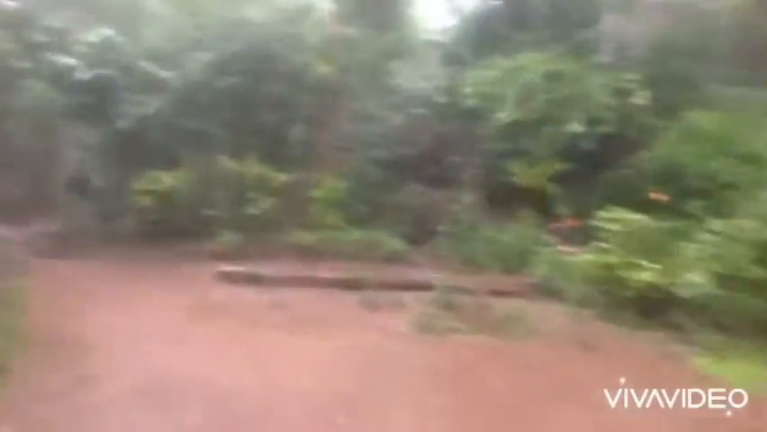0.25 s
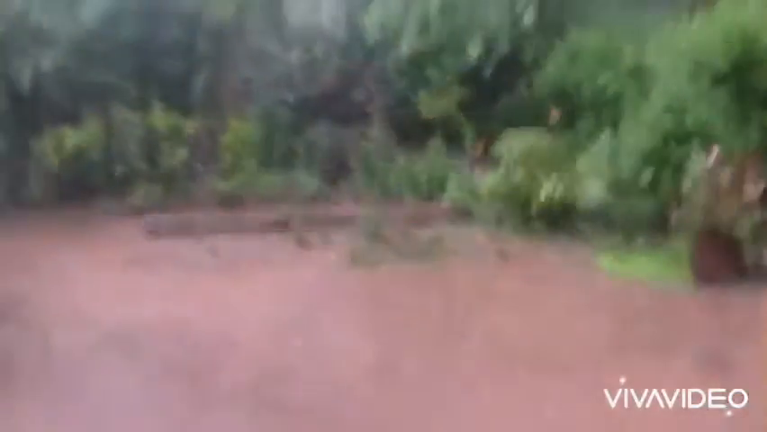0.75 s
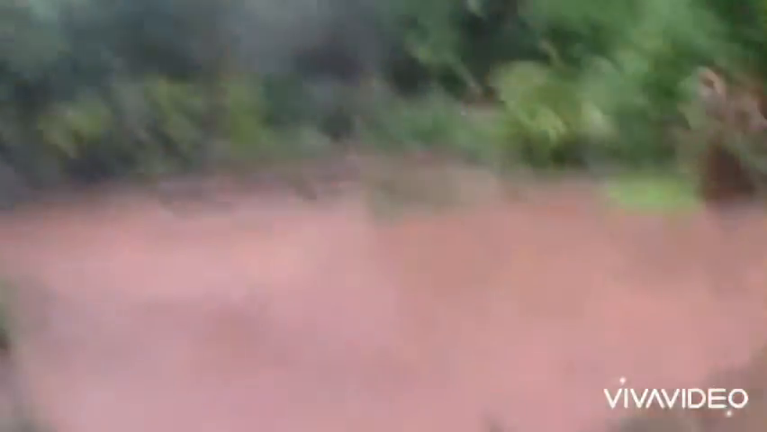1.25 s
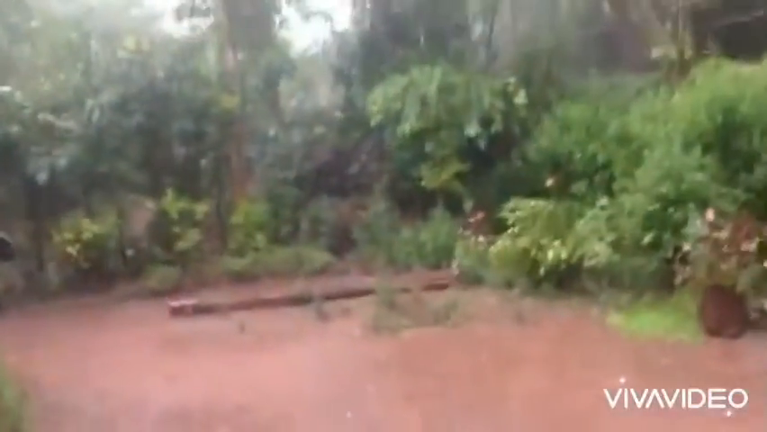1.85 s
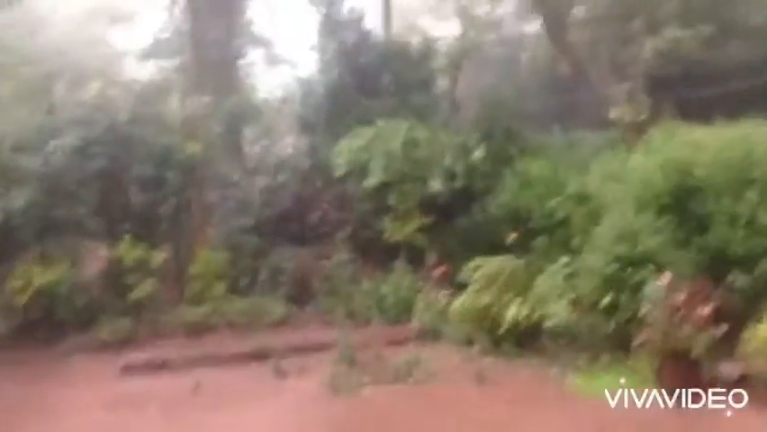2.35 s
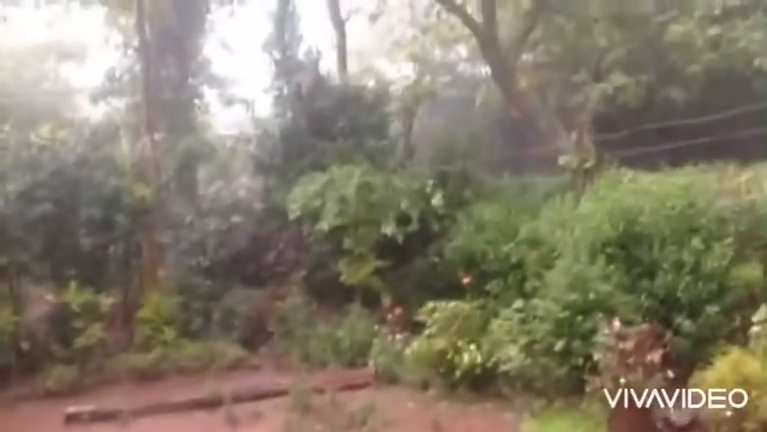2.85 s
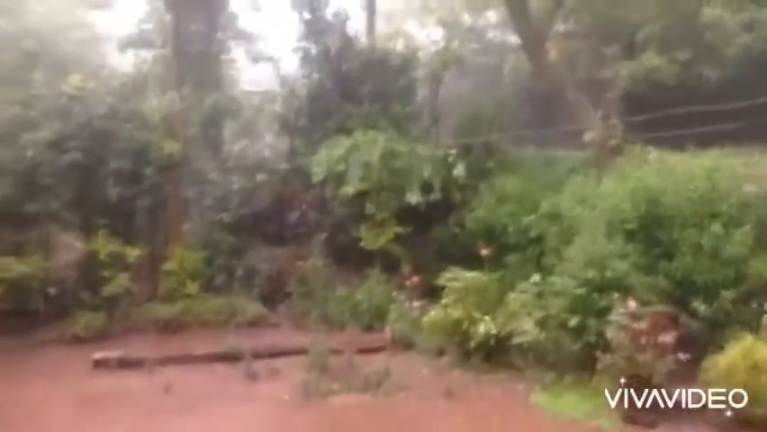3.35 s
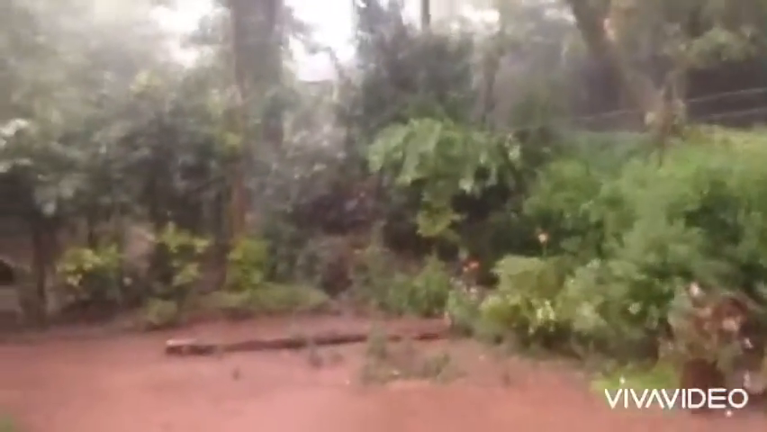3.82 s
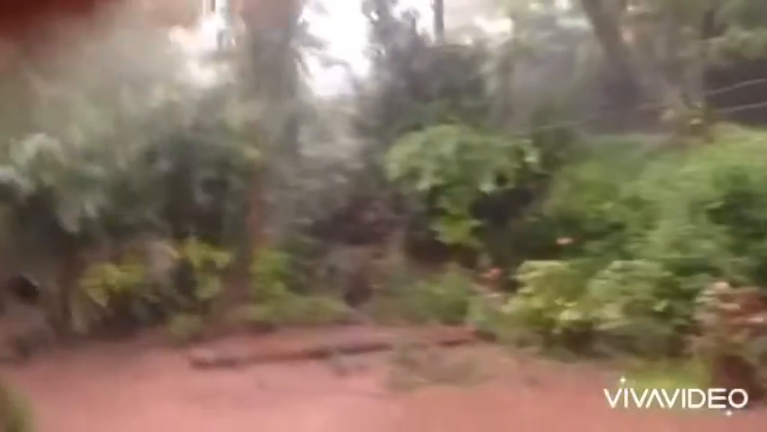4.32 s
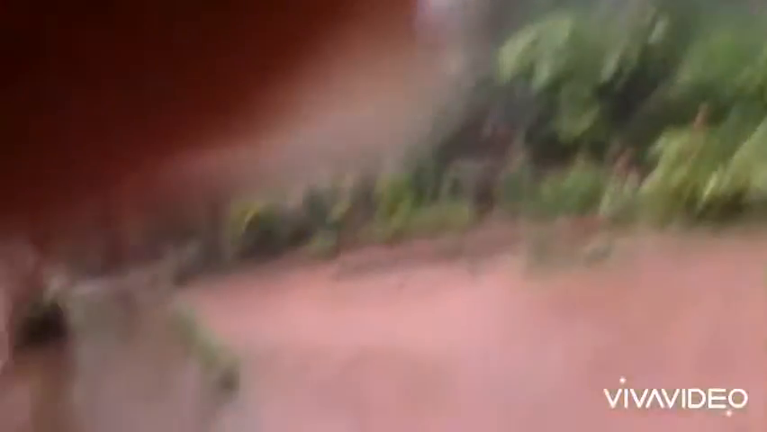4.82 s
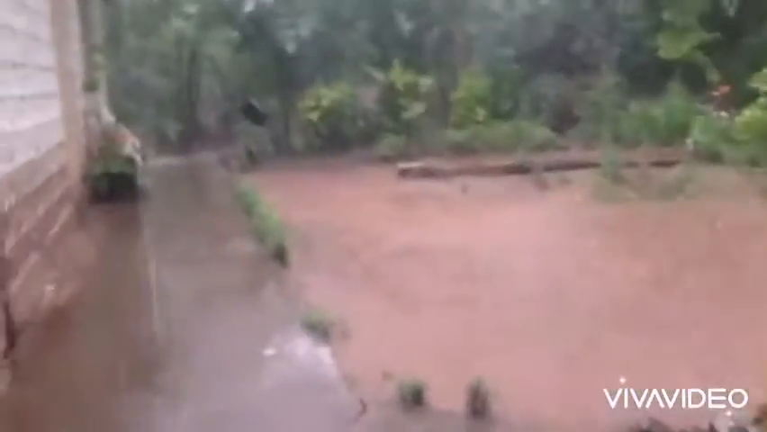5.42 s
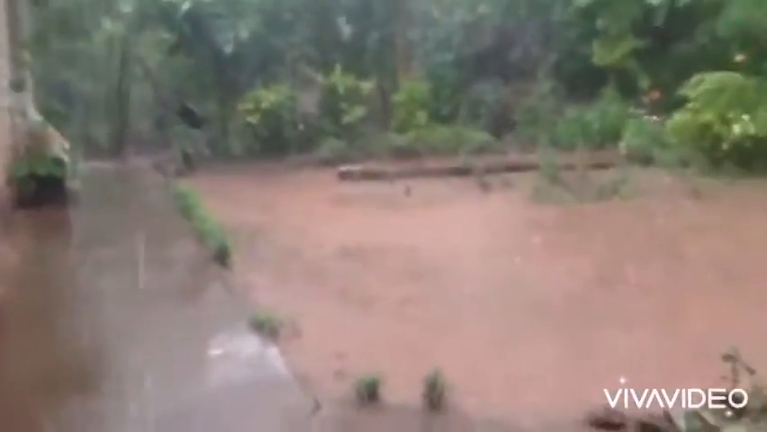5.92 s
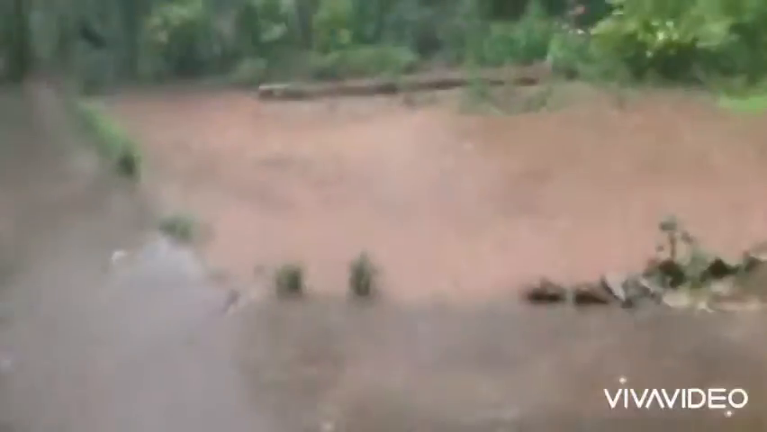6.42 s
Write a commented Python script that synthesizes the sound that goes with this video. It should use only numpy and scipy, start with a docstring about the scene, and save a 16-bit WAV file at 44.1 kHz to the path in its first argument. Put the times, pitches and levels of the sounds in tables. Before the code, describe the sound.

Outdoors in a downpour, the close mono microphone catches sharp wet claps and short plopping rings over a continuous rush of rain on puddles and leaves. Splashes crowd the opening, then come farther apart; crisp bright ticks gather around four seconds. One strong slap lands near five, then the wash eases slightly. Low roof rumble and occasional soft thuds sit far below.

```python
"""Heavy rain on a flooded yard and its bushes, heard from under the eaves in mono.
The far drops merge into a wash of shaped noise; nearer drops are short rings that plop, crackle and tick.
Water gathered on the eaves slaps the wet paving close by: ringing air, a clap of clicks and a spray.
Behind it the roof drums dully in low noise, and soft wobbling thuds bump the microphone."""
import sys
import numpy as np
from scipy import signal
from scipy.fft import rfft, irfft
from scipy.io import wavfile
from scipy.ndimage import uniform_filter1d, minimum_filter1d

SR = 44100
rng = np.random.default_rng(int(sys.argv[2]) if len(sys.argv) > 2 else 0)


def pcm_store(signal):
    """Save signal as 16-bit PCM."""
    levels = np.round(np.clip(np.atleast_2d(signal), -1, 1) * 32767)
    wavfile.write(sys.argv[1], SR, levels.astype(np.int16).T)


N = 294147
TIME = np.arange(N) / SR  # s


# How hard it rains, as the level of the wash: (time [s], level [dB])
RAIN_LEVEL = [(0, -28.5), (.6, -27.5), (1.1, -27.5), (1.45, -29), (2.15, -27.5), (2.4, -29.5), (2.6, -26.5),
              (3.3, -27), (3.9, -26), (5.05, -28), (5.35, -31.5), (6.2, -30), (6.67, -32.5)]
# Colour of the wash: (frequency [Hz], relative level [dB])
WASH_COLOUR = [(180, -25.5), (300, -2), (430, -4.5), (600, -3.5), (850, -1.5), (1200, -1.2), (1800, 1),
               (2020, 0.2), (2380, 1), (2520, -2.5), (2720, -7), (3000, -12), (4300, -33)]


def wash():
    """Far rain on puddles and leaves merges into noise, with nearer plops standing out of it."""
    def colour(f):
        return read(WASH_COLOUR, f)
    far = coloured(rng.standard_normal(N), colour)
    plops = patter(882, 2780, per_s=400, spread_db=0.5, cycles=1.3)
    near = coloured(plops, colour)
    rain = patchy(far + gain_of(-9.5) * near, depth_db=1.3, flicker_db=-0.01)
    return level(RAIN_LEVEL) * rain


def with_rain(db, follows):
    """Gain over time of a layer at db in the usual rain, moving by follows dB per dB of the wash."""
    usual_rain_db = -28
    return gain_of(db) * (level(RAIN_LEVEL) / gain_of(usual_rain_db)) ** follows


# Colour of the fine rain; its drops get half these dB: (frequency [Hz], relative level [dB])
FIZZ_COLOUR = [(1500, -27), (2600, -7), (3200, 1), (4200, -0.7), (5500, -5), (7200, -8.5), (9600, -11.5),
               (10500, -23)]
FIZZ_DB, FIZZ_FOLLOWS = -39.5, 0.84  # hiss in the usual rain, dB per dB of the wash


def fizz():
    """Fine drops crackle on the paving, growing then steady, over a hiss that follows the downpour."""
    hiss = coloured(rng.standard_normal(N), lambda f: read(FIZZ_COLOUR, f))
    hiss = patchy(hiss, depth_db=1.93, flicker_db=-0.26)
    drops = patter(3200, 9540, per_s=1000, spread_db=3.5, cycles=0.91)
    # the smallest, highest drops are the faintest
    drops = coloured(drops, lambda f: np.sqrt(read(FIZZ_COLOUR, f)))
    return with_rain(FIZZ_DB, FIZZ_FOLLOWS) * hiss + spatter_level() * drops


SPATTER_START_DB, SPATTER_END_DB, SPATTER_GROW_S = -53.5, -44.5, 4.2


def spatter_level():
    """Gain over time of the fine drops close by: a steady growth, then a hold."""
    return level([(0, SPATTER_START_DB), (SPATTER_GROW_S, SPATTER_END_DB)])


# Compactness makes a landing faster, narrower in pitch and richer in ringing air
LOOSE_RISE_S, SOLID_RISE_S = 0.0061, 0.0005
LOOSE_OCTAVES, SOLID_OCTAVES = 1.58, 0.22
SOLID_RING, RING_POWER = 1, 3  # energy share of the ring in a solid lump, curve towards it


def landing_of(compact):
    """Spread (octaves), energy share of bubble ring and rise (s) of a splash from its compactness."""
    compact = np.clip(compact, 0, 1)
    spread = LOOSE_OCTAVES * (SOLID_OCTAVES / LOOSE_OCTAVES) ** compact
    rise = LOOSE_RISE_S * (SOLID_RISE_S / LOOSE_RISE_S) ** compact
    ring = np.clip(SOLID_RING * compact ** RING_POWER, 0, 1)
    return spread, ring, rise


def burst(t, rise, length, tail_db, t60):
    """Two envelopes of a splash: the water landing, and its echo between wall and eaves."""
    landing = np.exp(-(t / length) ** 4)
    echo = (1 - landing) * gain_of(tail_db - 60 * (t - length) / t60) ** 2
    return (1 - np.exp(-t / rise)) * np.sqrt([landing, echo])


# Water slapping on the paving: (time [s], slap level [dB], centre pitch [Hz], length [s],
# spray level [dB], compactness [0-1, loose scatter to one solid lump])
SPLASHES = [ (0.012, -26, 1900, 0.032, -39, 0.5), (0.074, -22, 1770, 0.035, -40, 0.42),
            (0.256, -20.5, 1880, 0.02, -42, 0.17), (0.306, -12, 2070, 0.0068, -25, 0.92),
            (0.464, -20, 1770, .011, -38, 0.5), (0.4805, -8.5, 1800, 0.018, -31.5, 0.98),
            (0.930, -15, 1790, 0.028, -29.5, 0.47), (0.992, -27.5, 1790, 0.063, -38.5, 0.54),
            (1.339, -26, 2250, .008, -45, 0.76), (1.525, -19.5, 680, .065, -31.5, 0),
            (1.611, -22, 1760, 0.046, -31, 0.2), (1.752, -12.5, 1340, 0.021, -34, 0.7),
            (2.037, -24, 1880, .024, -30, 0), (2.466, -30, 1900, 0.043, -34, 0.1),
            (2.829, -20.5, 2266, 0.022, -29, 0.67), (3.399, -14.5, 1800, 0.019, -24.5, 0.46),
            (3.589, -18, 1900, 0.0072, -34, 0.53), (4.194, -23, 1790, .017, -27.5, 0.65),
            (4.214, -19, 1970, 0.021, -38, 0.5), (5.1135, -7, 1784, 0.022, -26, 0.73),
            (5.116, -16.5, 736, 0.02, -33, 0.58), ]
# Colour of the clap, before it is narrowed around the pitch: (frequency [Hz], relative level [dB])
SLAP_COLOUR = [(60, -31), (250, -4.5), (650, -1), (2400, 1), (2800, -6), (5000, -28), (10000, -29.5)]
# Colour of the droplets, before tilting in a splash or narrowing in a tick:
# (frequency [Hz], relative level [dB])
SPRAY_COLOUR = [(1200, -26.5), (2500, -13.5), (3400, 0.5), (4800, -5), (6500, -10), (9300, -11.5),
                (10500, -29)]
# A low-pitched splash throws a duller spray: tilt at the usual pitch, its change per octave of pitch
SPRAY_TILT_DB, TILT_FOLLOWS_DB, USUAL_SLAP_HZ = -1, 2, 1850


def splash(slap_db, hz, length, spray_db, compact, size=16384):
    """A lump of water claps on the wet ground, traps air that rings briefly, and throws droplets."""
    t = np.arange(size) / SR
    spread, ring, rise = landing_of(compact)

    def clap(octaves):
        def band(f):
            distance = abs(np.log2((f + 1) / hz) / octaves)
            return read(SLAP_COLOUR, f) / np.hypot(1, distance ** 1.7)
        return coloured(impacts(size, per_s=12000, spread_db=-0.3), band)

    # the air pocket wobbles, and its pitch climbs as it closes
    pitch = hz * (1 + 0.099 * sway(size, order=24) + 0.044 * np.tanh(2 * t / length - 1))
    bubble = evened(np.sin(2 * np.pi * np.cumsum(pitch) / SR))
    landing, echo = burst(t, rise, length, tail_db=-7.0, t60=0.29)
    _, yard = burst(t, rise, length, tail_db=-12.5, t60=0.41)
    # the water arrives in blobs a few milliseconds apart
    blobs = gain_of(1.4 * sway(size, order=64))
    body = np.sqrt(ring) * bubble + np.sqrt(1 - ring) * clap(spread)
    slap = under(landing * blobs, body)
    slap += under(np.hypot(echo, yard), clap(spread + 0.23))

    # finer droplets make a brighter spray, which flies off at first contact
    tilt_db = SPRAY_TILT_DB + TILT_FOLLOWS_DB * np.log2(hz / USUAL_SLAP_HZ)

    def spray_colour(f):
        return read(SPRAY_COLOUR, f) * gain_of(tilt_db * np.log2(1 + f / 800))

    spray = coloured(impacts(size, per_s=5000, spread_db=-0.5), spray_colour)
    spray_envelope = np.hypot(*burst(t, 0.29 * rise, length, tail_db=-3, t60=0.23))
    return gain_of(slap_db) * slap + gain_of(spray_db) * under(spray_envelope, spray)


# The sharpest single drops on hard ground close by: (time [s], peak level of the ring [dB], pitch [Hz])
TICKS = [(0.3068, -13.5, 6160), (3.3995, -21, 4760), (3.8453, -22, 6000), (4.1895, -15, 5460),
         (4.2335, -18, 5200), (4.6065, -21, 5200), (4.8205, -20, 4970), (4.9677, -25, 5960),
         (5.9151, -26, 5600), (6.341, -24.5, 7860), (6.366, -22.5, 4970)]


def tick(db, hz, size=2048):
    """A sharp drop rings for a few cycles, with a brief fading sprinkle near the same pitch."""
    t = np.arange(size) / SR

    def band(f):
        return read(SPRAY_COLOUR, f) / np.hypot(1, np.log2((f + 1) / hz) / 0.13)

    sprinkle = coloured(rng.standard_normal(size), band)
    fade = gain_of(-60 * t / 0.068)
    sound = gain_of(-10) * under(fade, sprinkle)
    add(sound, 0, ping(hz, cycles=0.7))
    return gain_of(db) * sound


STRAY_PER_S = 6  # mean rate at full spatter
STRAY_DB, STRAY_SPREAD_DB = -29, 1.5
STRAY_HZ, STRAY_OCTAVES = 6250, 0.35  # middle pitch, its spread


def stray_ticks(count=80):
    """Lesser drops tick on hard ground at random moments, more often as the spatter grows."""
    out = np.zeros(N)
    nearness = spatter_level() / gain_of(SPATTER_END_DB)
    draws = zip(rng.random((count, 2)), rng.standard_normal((count, 2)))
    for (place, chance), (strength, pitch) in draws:
        at = int(place * N)
        if chance < nearness[at] * STRAY_PER_S * N / SR / count:
            db = STRAY_DB + STRAY_SPREAD_DB * strength
            add(out, TIME[at], tick(db, STRAY_HZ * 2 ** (STRAY_OCTAVES * pitch)))
    return out


# Soft bumps on the microphone: (time [s], peak envelope level [dB], centre pitch [Hz],
# length [s, twice the time to the peak])
BUMPS = [(0.08, -32, 48, 0.09), (0.095, -23.5, 152.4, 0.029), (1.895, -23, 94, 0.022),
         (1.938, -24.5, 100, .018), (2.84, -30, 114.8, 0.077), (3.53, -28, 124, 0.061),
         (3.82, -28.5, 99, 0.063), (6.46, -28, 78, 0.023)]


def bump(db, hz, length, size=22050):
    """A soft low thud whose pitch wobbles."""
    age = 2 * np.arange(size) / SR / length
    turns = np.cumsum(hz * (1 + 0.17 * sway(size, order=400))) / SR
    return gain_of(db) * age * np.exp(1 - age) * np.sin(2 * np.pi * turns)


# The rumble overhead, one slow swell: (time [s], level [dB])
RUMBLE_LEVEL = [(0, -42.5), (1.2, -38), (2.3, -37), (3.25, -37), (3.75, -33.5), (5.3, -38.5), (6.67, -37.5)]
# Colour of the rumble: (frequency [Hz], relative level [dB])
RUMBLE_COLOUR = [(15, -27.5), (30, -20), (45, -10), (60, -4.5), (80, 0.5), (100, -4), (122, 2.5),
                 (150, -11), (230, -2), (330, -15.5), (550, -33)]
# Low modes of the roof: (frequency [Hz], half width [Hz], relative level [dB])
ROOF_MODES = [(163.6, 14, 3), (178.6, 10, -10), (211.4, 17, -10), (287, 17, -9)]
RUMBLE_LUMPS_DB = 1.9  # rms depth of the lumps
BOOM_DB, BOOM_FOLLOWS, BOOM_WAVER_DB = -38, 0.1, 0.76  # usual rain, dB per dB of the wash, rms waver


def roof():
    """Rain excites the low modes of the roof, which hum unevenly above a dull rumble."""
    def modes(f):
        return sum(gain_of(db) / (1 + ((f - hz) / width) ** 2) for hz, width, db in ROOF_MODES)
    rumble = coloured(rng.standard_normal(N), lambda f: read(RUMBLE_COLOUR, f))
    boom = coloured(rng.standard_normal(N), modes)
    waver = gain_of(BOOM_WAVER_DB * sway(N, order=8000))
    lumps = gain_of(RUMBLE_LUMPS_DB * sway(N, order=2500))
    hum = with_rain(BOOM_DB, BOOM_FOLLOWS) * waver * boom
    return level(RUMBLE_LEVEL) * evened(lumps * rumble) + hum


def patter(low_hz, high_hz, per_s, spread_db, cycles, count=24):
    """A shower of drops of many sizes, each size with its own pitch."""
    total = np.zeros(N)
    for hz in np.geomspace(low_hz, high_hz, count):
        hits = impacts(N, per_s / count, spread_db)
        total += signal.oaconvolve(hits, evened(ping(hz, cycles)))[:N]
    return evened(total)


def ping(hz, cycles):
    """The ring of one drop: a few cycles that start softly and die; envelope peak 1."""
    turns = hz * np.arange(600) / SR
    age = turns / cycles
    return age * np.exp(1 - age) * np.sin(2 * np.pi * turns)


def impacts(size, per_s, spread_db):
    """Random clicks of either sign, a few much louder than most (fainter if spread_db is negative)."""
    heights = gain_of(spread_db * np.minimum(rng.exponential(1, size), 5))
    signs = rng.choice([-1, 1], size)
    return evened(heights * signs * (rng.random(size) < per_s / SR))


def patchy(x, depth_db, flicker_db):
    """Drops fall in clumps: patches of the spectrum, and all of it together, swell and fade."""
    z = signal.stft(x, nperseg=512)[2]
    patches = uniform_filter1d(rng.standard_normal(z.shape), size=7, axis=0)  # across frequency
    patches = evened(uniform_filter1d(patches, size=8, axis=1))  # across time
    flicker = evened(uniform_filter1d(rng.standard_normal(z.shape[1]), size=6))
    gain = gain_of(depth_db * patches + flicker_db * flicker)
    return evened(signal.istft(z * gain, nperseg=512)[1][:N])


def coloured(x, gain):
    """Filters by a gain that is a function of frequency; rms 1."""
    return evened(irfft(rfft(x) * gain(np.fft.rfftfreq(len(x), 1 / SR)), len(x)))


def under(envelope, x):
    """Shapes a sound by an envelope and gives it the energy of that envelope."""
    return evened(x * envelope) * np.sqrt(np.mean(envelope ** 2))


def sway(size, order):
    """A smooth random curve of rms 1 that changes over about order samples."""
    smooth = uniform_filter1d(rng.standard_normal(size), size=order)
    return evened(uniform_filter1d(smooth, size=order))


def gain_of(db):
    """Decibels to a factor."""
    return 10 ** (np.asarray(db) / 20)


def evened(x):
    """Scales to rms 1."""
    return x / np.sqrt(np.mean(x ** 2) + 1e-20)


def read(points, hz):
    """Gain of a colour table at the given frequencies, read on a log frequency scale."""
    f, db = np.transpose(points)
    return gain_of(np.interp(np.log(hz + 1), np.log(f + 1), db))


def level(rows):
    """Gain over time from a dB curve."""
    return gain_of(np.interp(TIME, *np.transpose(rows)))


def add(mix, s, sound):
    """Mixes a sound in at time s."""
    part = mix[max(round(s * SR), 0):][:len(sound)]
    part += sound[:len(part)]


def scene():
    """All of the rain at one microphone, the same in both channels."""
    mix = wash() + fizz() + roof()
    for rows, source in (SPLASHES, splash), (TICKS, tick), (BUMPS, bump):
        for s, *values in rows:
            add(mix, s, source(*values))
    mix += stray_ticks()
    return np.array([mix, mix])


EDGE_HZ = 10150  # upper limit of the band


def record(dry):
    """A fast limiter holds the loudest peaks under full scale; then a low-pass limits the band."""
    room_left = np.minimum(1, 0.97 / (abs(dry).max(axis=0) + 1e-9))
    limiter_gain = uniform_filter1d(minimum_filter1d(room_left, size=65), size=65)
    low_pass = signal.firwin(221, EDGE_HZ, window=("kaiser", 7), fs=SR)
    return signal.oaconvolve(dry * limiter_gain, low_pass[None], "same")


dry = scene()
out = record(dry)
pcm_store(out)
```